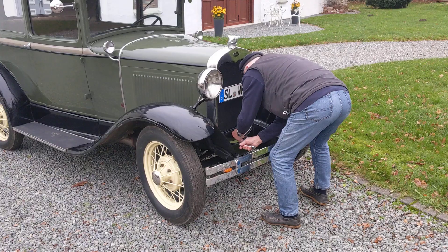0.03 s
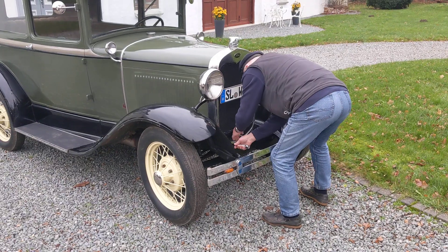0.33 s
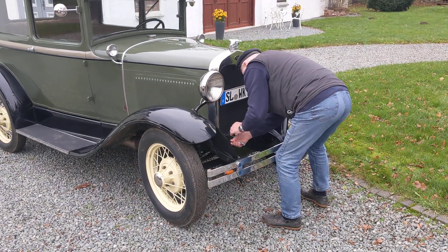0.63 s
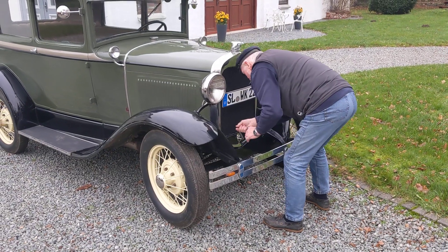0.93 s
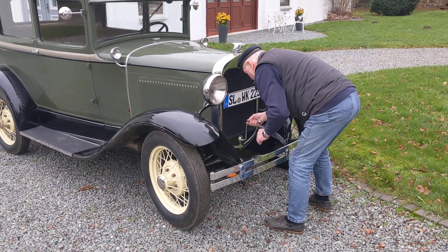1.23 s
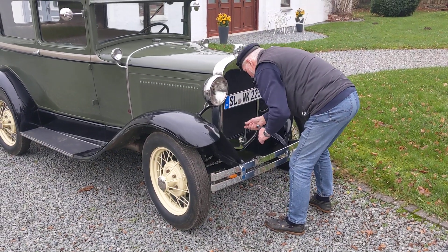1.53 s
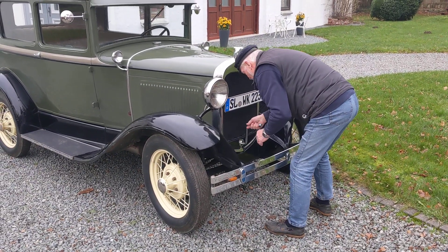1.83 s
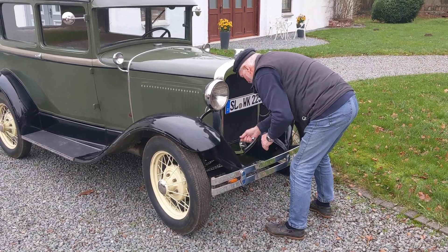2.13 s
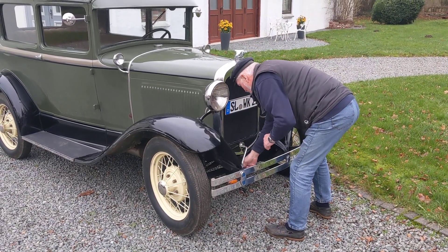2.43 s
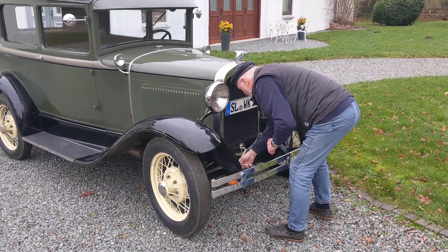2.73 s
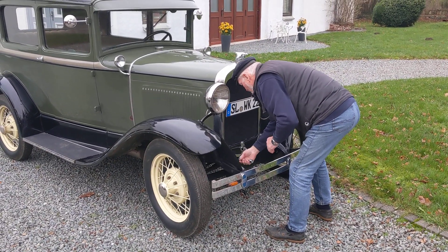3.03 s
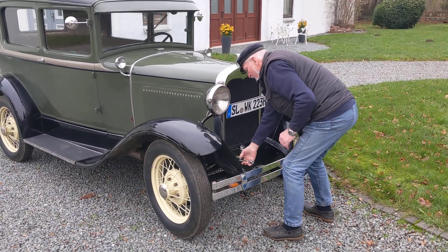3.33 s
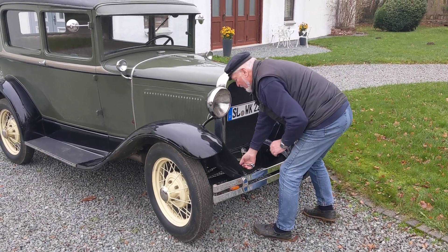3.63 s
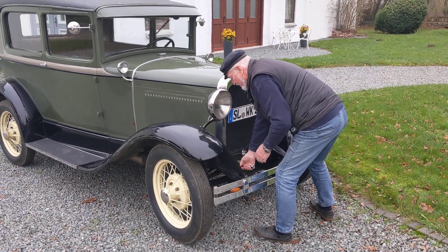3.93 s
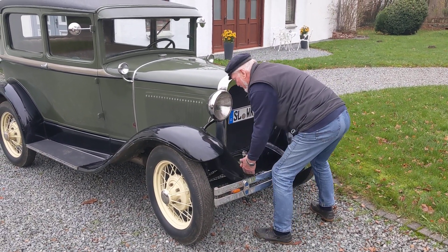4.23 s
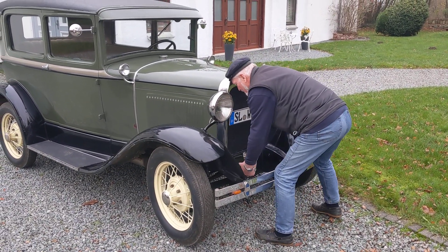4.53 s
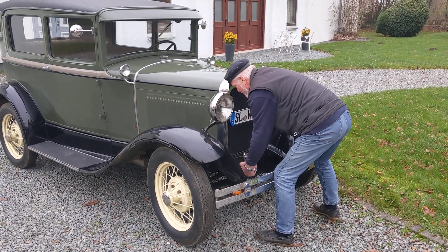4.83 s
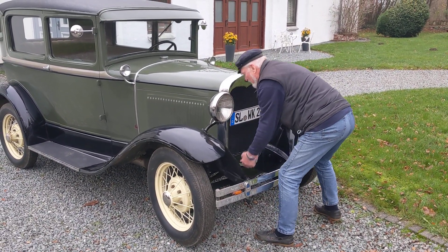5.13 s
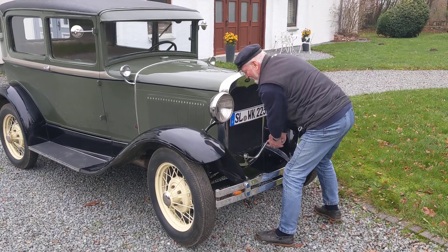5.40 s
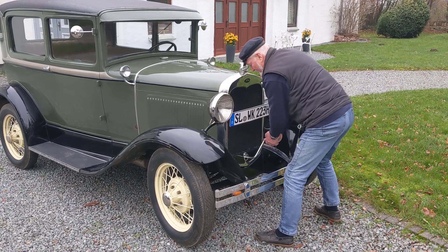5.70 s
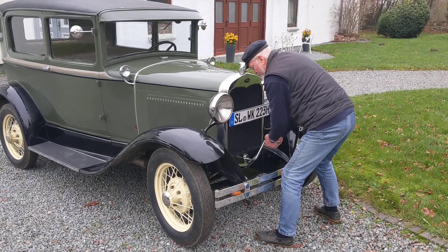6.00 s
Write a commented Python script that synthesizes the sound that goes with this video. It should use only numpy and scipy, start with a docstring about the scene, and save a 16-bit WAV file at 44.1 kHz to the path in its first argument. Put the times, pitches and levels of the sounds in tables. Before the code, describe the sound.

A metal hand crank slides into a vintage car, clanking and scraping as the engine is eased round and the chassis groans and rumbles. The knocks stop and shoes shift on gravel. Then one sharp pull brings a loud clatter, and the engine catches, rasps briefly against the crank and settles into a slow, ticking idle. The car stands a few metres away to the right, in a quiet outdoor hush.

```python
"""A crank handle scrapes and clanks over an outdoor hush: a vintage car is being started by hand.
Friction and impacts excite the modes of its ironwork as the engine is eased round and the car heaves.
Shoes shift on the gravel drive, each crunch a crowd of tiny collisions, and a sleeve rustles.
After one sharp pull the engine catches, throws the crank off its ratchet and settles to a slow idle,
a train of pulses that rings the exhaust. The car stands a few metres away, to the right."""
import sys
import numpy as np
from scipy import signal
from scipy.fft import rfft, irfft, next_fast_len
from scipy.io import wavfile

SR = 44100
rng = np.random.default_rng(int(sys.argv[2]) if len(sys.argv) > 2 else 0)


def log_audio(samples):
    """Write samples as a 16-bit WAV file to the path given in sys.argv[1]."""
    # one column per channel
    frames = np.atleast_2d(samples).T
    # limit to full scale, then quantise
    limited = np.clip(frames, -1, 1)
    pcm = np.round(limited * 32767).astype(np.int16)
    wavfile.write(sys.argv[1], SR, pcm)


N = 276066
TIME = np.arange(N) / SR

# blows of the crank:
# (time [s], chatter time [s], chassis thud [dB], shaft clang [dB], handle clash [dB])
CRANK_BLOWS = [(0.249, 0.0094, -46, -34, -30.5), (.31, .0068, -45, -30.5, -25),
               (0.324, 0.008, -45, -36, -26), (.526, 0.0013, -54.5, -55, -42),
               (0.654, 0.0053, -44.5, -40, -45.5), (0.712, 0.0061, -47, -36, -41),
               (0.791, 0.0054, -48.5, -46.5, -44.5), (0.858, 0.0093, -55.5, -41.5, -36.5),
               (.909, .011, -55, -52, -48.5), (0.926, .008, -58, -45, -42.5),
               (0.99, 0.0061, -60, -43.5, -43.5), (1.001, 0.015, -67, -63, -42),
               (1.047, 0.0063, -44, -45.5, -42.5), (1.101, 0.0033, -95, -72, -49.5),
               (1.134, 0.0087, -64, -67, -51), (1.286, 0.0061, -43, -36, -30.5),
               (1.311, 0.0026, -41.5, -58, -45.5), (1.517, 0.0046, -48, -43.5, -50),
               (1.675, .0035, -53, -57.5, -64), (1.946, 0.0079, -45, -46, -47),
               (1.963, 0.002, -54.5, -55, -46), (2.45, 0.0036, -53, -50, -53.5),
               (2.522, 0.0056, -67, -45.5, -42.5), (2.547, 0.00056, -71, -71, -54),
               (2.692, 0.0013, -43, -40, -49), (2.713, 0.0027, -50, -42, -47),
               (2.737, 0.0052, -47, -51, -44), (2.776, 0.00081, -65, -69, -46.5),
               (2.813, 0.0035, -48, -37.5, -43.5), (2.824, 0.0027, -41, -52, -38),
               (2.9, 0.0066, -38, -39.5, -31), (2.961, 0.0026, -46, -54, -47),
               (3.323, 0.00067, -59.5, -51, -41), (5.356, 0.006, -59, -51, -52.5),
               (5.478, 0.022, -32, -24.5, -23.5), (5.488, 0.0037, -29.5, -27.5, -26.5),
               (5.498, 0.0037, -31, -28, -21), (5.545, 0.0013, -45, -38, -40.5),
               (5.556, 0.014, -45, -35, -32.5), (5.597, 0.0065, -40, -36, -34.5),
               (5.682, 0.053, -58, -46, -41.5), (5.733, 0.011, -43, -41, -36.5)]
# thud, clang, clash and tick registers of the ironwork: (lower edge [Hz], upper edge [Hz])
IRON_REGISTERS = [(100, 450), (450, 1800), (1800, 5800), (5800, 15500)]


def undb(db):
    """Amplitude ratio of a level in decibels."""
    return 10 ** (np.asarray(db) / 20)


def unit(x):
    """Normalisation to an rms of 1."""
    return x / np.sqrt(np.mean(x ** 2) + 1e-20)


def add(track, s, sound):
    """Superposition: a sound joins the track at time s."""
    i = int(np.clip(s * SR, 0, N - 1))
    track[i:i + len(sound)] += sound[:N - i]


def band(x, lo_hz, hi_hz, order=3):
    """Causal band-pass filtering."""
    sos = signal.butter(order, [lo_hz, min(hi_hz, .45 * SR)], "band", fs=SR, output="sos")
    return signal.sosfilt(sos, x)


def colour(x, spectrum, lag_s=0):
    """Spectral shaping by (frequency [Hz], gain [dB]) points; a linear phase adds the delay."""
    size = next_fast_len(len(x) + 64, real=True)
    f = np.fft.rfftfreq(size, 1 / SR)
    hz, db = np.transpose(spectrum)
    gain = undb(np.interp(np.log(f + 1), np.log(hz), db))
    return irfft(rfft(x, size) * gain * np.exp(-2j * np.pi * f * lag_s), size)[:len(x)]


def fade(t, t60):
    """Exponential decay, by 60 dB in t60 seconds."""
    return np.exp(-np.log(1000) * t / t60)


def ring(modes, size=22050):
    """Modal impulse response: a damped sine for each (frequency [Hz], energy [dB], t60 [s])."""
    t = TIME[:size]
    return unit(sum((-1) ** k * undb(db) / np.sqrt(t60) * fade(t, t60) * np.sin(2 * np.pi * hz * t)
                    for k, (hz, db, t60) in enumerate(modes)))


def excite(force, response):
    """Convolution: a linear body answers a force through its impulse response."""
    return signal.fftconvolve(force, response)[:len(force)]


def grains(per_s, spread_db, size=N):
    """Shot noise: random tiny impacts, a few much stronger than the rest if spread_db is positive."""
    strength = undb(spread_db * np.minimum(rng.exponential(size=size), 4))
    return (rng.random(size) < per_s / SR) * strength * rng.standard_normal(size)


def gestures(table, attack_s, t60):
    """Power summation of rows that rise, hold and decay; one envelope for each level column."""
    power = 0
    for s, length_s, *levels_db in table:
        rise = np.clip((TIME - s) / attack_s, 0, 1)
        release = fade(np.maximum(TIME - s - length_s, 0), t60)
        power = power + np.outer(undb(levels_db), rise * release) ** 2
    return np.sqrt(power)


def air(level_db=-57):
    """Stationary noise: the distant outdoor hush, its level set by the part above 200 Hz."""
    # spectrum of the hush: (frequency [Hz], gain [dB])
    hush_spectrum = [(12, -50), (20, 6.5), (64, -13.5), (175, -4), (333, -11.5), (393, -15), (649, -11),
                     (1040, -12.5), (1380, -19), (1630, -9), (4070, -23), (6540, -27.5), (15500, -31.5)]
    hush = colour(rng.standard_normal(N), hush_spectrum)
    return hush * undb(level_db) / band(hush, 200, 15500).std()


def rumble(steady_db=-55, rise_s=0.033):
    """Amplitude modulation: a steady low noise swells with each heave of the car on its springs."""
    # heaves as the engine is turned over: (time [s], level [dB])
    heaves = [(.03, -50.5), (1.0, -45), (1.55, -48), (1.92, -48), (2.86, -46)]
    # spectrum of the rumble: (frequency [Hz], gain [dB])
    rumble_spectrum = [(11, -62), (18, -17), (48, 0), (64, -2), (97, -11), (110, -13.5), (140, -28),
                       (240, -120)]
    swell, = gestures([(s, rise_s, db) for s, db in heaves], rise_s, t60=2.5)
    return unit(colour(rng.standard_normal(N), rumble_spectrum)) * np.hypot(undb(steady_db), swell)


def iron(dense_db=4, low_t60=0.29, high_t60=0.046, size=22050):
    """Modal response of the ironwork: clear modes over dense ones whose treble is damped fastest."""
    # clear modes of crank and front end: (frequency [Hz], energy [dB], t60 [s])
    clear_modes = [(133, -4, .25), (152, -4, .22), (180, -12, .2), (255, -13, .25), (333, -6, .25),
                   (439, -13, .2), (590, -7, .3), (680, -8, .2), (720, -4, .2), (769, -1.5, .25),
                   (812, -4, .25), (941, -3, .25), (1010, -4, .25), (1075, -.5, .2), (1170, -2, .15),
                   (1530, -8, .14), (1720, -12, .12), (2131, -10, .14), (2470, -7, .11), (2967, -2, .12),
                   (3444, -7, .13), (3700, -10, .1), (4050, -6, .08), (4380, -8, .1), (5170, -11, .08),
                   (6400, -8, .035), (8320, -12, .07), (9150, -16, .05), (10120, -13, .05),
                   (12800, -23, .04)]
    # spectrum of the dense modes: (frequency [Hz], gain [dB])
    dense_spectrum = [(100, -13.5), (160, -20), (390, -21), (700, -5.5), (1150, -13), (1400, -11.5),
                      (2200, -14.5), (3100, -10), (4800, -19.5), (5700, -26.5), (8500, -21.5),
                      (10800, -21.5), (12200, -29.5), (15500, -36)]
    t = TIME[:size]
    noise = colour(rng.standard_normal(size), dense_spectrum)
    t60s = np.geomspace(low_t60, high_t60, len(IRON_REGISTERS))
    dense = sum(band(noise, *edges) * fade(t, t60) / np.sqrt(t60)
                for edges, t60 in zip(IRON_REGISTERS, t60s))
    # each grip and strike point shifts and weights the modes anew
    modes = [(hz * rng.normal(1, .008), db + rng.normal(0, 3), t60) for hz, db, t60 in clear_modes]
    return ring(modes) + undb(dense_db) * unit(dense)


def crank_friction(scrape_db=-1, groan_db=-1, rattle_db=-27, rasp_db=2):
    """Friction drives resonances: the shaft scrapes in its guide, the chassis groans, the grip squeaks."""
    # pushes on the crank: (time [s], duration [s], scrape [dB], chassis groan [dB])
    pushes = [(.03, 0.45, -50.5, -44.5), (.25, 0.058, -36.5, -44), (.65, 0.14, -53.5, -50.5),
              (.87, 0.27, -50.5, -44.5), (1.28, 0.054, -48.5, -43.5), (1.51, 0.19, -61, -48.5),
              (1.93, 0.06, -59, -48), (2.14, 0.33, -70.5, -61), (2.44, 0.13, -54, -46.5),
              (2.68, 0.23, -50.5, -51)]
    # the shaft slides into its guide: (time [s], duration [s], level [dB])
    insertion = [(.17, 0.24, -52.5)]
    # dry squeaks of the handle: (time [s], duration [s], level [dB])
    squeaks = [(2.12, 0.208, -60.5), (2.37, .025, -40.5)]
    # resonances of the grip: (frequency [Hz], energy [dB], t60 [s])
    grip_modes = [(3990, -1.5, 0.015), (6500, -10, 0.018), (8330, -0.5, 0.061)]
    # scrape that swells into the starting pull: (time [s], duration [s], level [dB])
    starting_pull = [(5.458, 0.032, -27.5)]
    rub, load = gestures(pushes, attack_s=0.0083, t60=0.53)
    # the loose front end rattles on after each blow, below its clash
    rattles = [(s, chatter_s, clash_db + rattle_db) for s, chatter_s, _, _, clash_db in CRANK_BLOWS]
    rattle, = gestures(rattles, attack_s=0.01, t60=0.5)
    rubbed = excite(grains(2500, spread_db=4), iron(dense_db=11))
    scrape = unit(band(rubbed, 460, 3800, order=2)) * np.hypot(rub * undb(scrape_db), rattle)
    groan = unit(band(rubbed, 93, 308)) * load * undb(groan_db)
    slips = grains(5000, spread_db=0)
    slide = unit(band(slips, 5800, 9800, order=2)) * gestures(insertion, attack_s=0.061, t60=0.083)[0]
    grip = unit(excite(slips, ring(grip_modes))) + undb(rasp_db) * unit(band(slips, 2400, 3560))
    squeak = grip * gestures(squeaks, attack_s=0.25, t60=0.046)[0]
    pull = unit(band(rubbed, 120, 14000, order=2)) * gestures(starting_pull, attack_s=0.05, t60=.1)[0]
    return scrape + groan + slide + squeak + pull


def crank_impacts(contacts_per_s=2800, hard_s=0.0045, roughness=0.4, ring_rise_s=0.0016, size=22050):
    """Impact excitation: loose joints slam shut and chatter; the shorter the contact, the brighter."""
    # single parts ringing after a knock: (time [s], frequency [Hz], level [dB], t60 [s])
    ringing_parts = [(0.252, 1083, -29, 0.14), (0.309, 5980, -27.5, .27), (0.311, 1584, -28, .18),
                     (.314, 2520, -47, 0.086), (.526, 6560, -23.5, 0.019), (0.526, 10030, -27.5, .04),
                     (0.714, 1040, -37, 0.18), (0.861, 2560, -34.5, 0.25), (1.047, 2496, -35, 0.13),
                     (1.519, 823, -29.5, 0.062), (1.975, 178, -38, 0.24), (2.295, 130.3, -41.5, 0.59),
                     (3.324, 10030, -19.5, 0.038), (5.372, 1560, -37.5, .092), (5.454, 134, -37.5, 0.25),
                     (5.500, 787, -25, 0.14), (5.557, 5200, -27.5, .06), (5.597, 2980, -20.5, 0.068),
                     (5.648, 1765, -30, 0.17)]
    out, t = np.zeros(N), TIME[:size]
    attack = slice(0, SR // 40)
    for s, chatter_s, thud_db, clang_db, clash_db in CRANK_BLOWS:
        swell = np.minimum(.35 + 3 * t / chatter_s, 1)
        decay = np.exp(-(t / (1.5 * chatter_s)) ** 2)
        force = grains(contacts_per_s, spread_db=3, size=size) * swell * decay
        force[0] += np.linalg.norm(force) * .0011 / chatter_s + 1e-6  # short knocks start hardest
        blow = excite(force, iron())
        # the edge tick follows the clash and is stronger for hard, short contacts
        tick_db = clash_db - 13.5 + 18 * np.exp(-(chatter_s / hard_s) ** 2)
        for edges, db in zip(IRON_REGISTERS, (thud_db, clang_db, clash_db, tick_db)):
            part = band(blow, *edges)
            add(out, s, undb(db) * part / part[attack].std())
    for s, hz, db, t60 in ringing_parts:
        # small parts buzz in their joints while they ring, heavy ones hardly at all
        buzz = min(hz / 5000, 1) * unit(band(rng.standard_normal(size), 12, 160, order=2))
        tone = np.sin(2 * np.pi * hz * t + buzz) * (1 + roughness * buzz[::-1])
        add(out, s, undb(db) * tone * fade(t, t60) * np.minimum(t / ring_rise_s, 1))
    return out


def stones(snap_t60=0.03, settle_db=-17, settle_t60=0.12, size=4410):
    """Two-stage decay: a stone snaps and its neighbours settle. Returns the far and near shares."""
    # single stones: (time [s], level [dB], pitch [Hz], leftward bias [dB])
    snaps = [(1.749, -36, 2470, -0.5), (1.755, -32, 2180, 20), (1.778, -43.5, 1470, 1),
             (3.457, -49, 3800, 0), (3.488, -52, 4950, -4), (3.517, -35.5, 5770, 0), (3.546, -42, 4900, -7),
             (3.573, -46, 4130, -15), (3.59, -41, 3780, -15), (3.835, -46, 3180, 1),
             (3.876, -43.5, 4800, -5), (4.012, -50, 4200, -10), (4.336, -37.5, 4200, 1),
             (4.572, -45.5, 4870, 1), (4.61, -48, 3340, -12), (4.982, -53, 3530, -8),
             (5.213, -51, 1920, -3)]
    far, near, t = np.zeros(N), np.zeros(N), TIME[:size]
    for s, db, hz, left_db in snaps:
        near_share = np.clip(1 - undb(-left_db), 0, 1)
        # near stones, on the left, arrive short and clean
        impact = fade(t, snap_t60 * undb(-2 * max(left_db, 0)))
        settling = undb(settle_db - 2 * left_db) * fade(t, settle_t60)
        snap = band(rng.standard_normal(size) * (impact + settling), hz / 3.07, hz * 1.93)
        snap *= undb(db) / snap[:SR // 125].std()
        add(far, s, (1 - near_share) * snap)
        add(near, s, 2 * near_share * snap)
    return far, near


def shoes(tread_db=-1):
    """Granular friction: pebbles of several sizes grind underfoot, with a duller crunch under weight."""
    # slips of the shoes: (time [s], duration [s], crunch [dB], weight [dB])
    slips = [(3.07, 0.047, -63, -75.5), (3.31, 0.093, -56, -60), (3.44, 0.08, -49, -74),
             (3.56, 0.031, -46, -52.5), (3.65, 0.071, -52, -61.5), (3.79, .14, -50, -63.5),
             (3.95, .15, -49.5, -58), (4.28, 0.038, -53.5, -56), (4.555, 0.059, -46, -49),
             (4.66, 0.018, -59, -71), (4.92, 0.081, -55, -61.5), (5.11, 0.038, -60.5, -62.5),
             (5.18, 0.034, -49, -51.5), (5.26, 0.24, -59, -63)]
    # faint grinding between slips: (time [s], duration [s], crunch [dB], weight [dB])
    stance = [(3.006, 1.765, -63, -68), (4.872, 0.35, -62.5, -79)]
    # spectrum of the gravel: (frequency [Hz], gain [dB])
    gravel_spectrum = [(880, -71), (1500, -61.5), (1790, -10.5), (3180, -6), (5340, -11.5), (6820, -7.5),
                       (9420, -16.5), (10500, -9), (12200, -21), (15500, -31)]
    sliding, weight = gestures(slips + stance, attack_s=0.019, t60=0.19)
    judder = undb(2.2 * unit(band(rng.standard_normal(N), 10, 70, order=2)))
    edges_hz = np.geomspace(1200, 15500, 7)  # one band for each pebble size
    pebbles = sum(band(grains(2000, spread_db=3), lo, hi, order=2)
                  for lo, hi in zip(edges_hz, edges_hz[1:]))
    grit = unit(colour(pebbles, gravel_spectrum))
    tread = unit(band(grains(2500, spread_db=-2), 393, 1230, order=2))
    return judder * (grit * sliding + tread * weight * undb(tread_db))


def sleeve():
    """Friction noise: cloth drags in a faint, narrow-band rustle as the grip is changed."""
    # rub of the sleeve: (time [s], duration [s], level [dB])
    rubs = [(4.15, 0.42, -61)]
    rustle = unit(band(grains(3000, spread_db=4), 1800, 2300, order=2))
    return rustle * gestures(rubs, attack_s=0.058, t60=0.22)[0]


def engine(ticks_per_firing=0.72, knock_db=-3, valve_ring_db=-12, valve_gain_db=1, exhaust_gain_db=1):
    """Periodic forcing: slow firings thump the exhaust and shake the gears while the valve gear ticks."""
    # run-up to idle: (time [s], firing rate [Hz], exhaust [dB], gear clatter [dB], valve noise [dB])
    run_up = [(5.52, 15, -62, -50, -60), (5.60, 16.5, -49, -42, -50), (5.70, 19.5, -44, -43, -43),
              (5.78, 20.5, -41, -42, -42), (5.90, 19, -39, -40, -45), (6.04, 17.2, -39, -42, -47),
              (6.16, 15.7, -40, -41, -47), (6.26, 15.5, -42, -43, -48)]
    # resonances of the exhaust: (frequency [Hz], energy [dB], t60 [s])
    exhaust_modes = [(57, 0, .085), (152, -10, .07), (250, -15, .06), (332, -15, .08)]
    # spectrum of the gear clatter: (frequency [Hz], gain [dB])
    gear_spectrum = [(210, -9), (350, -10), (421, -20), (518, -4.5), (755, -4.5), (822, -19), (1170, -7.5),
                     (1400, -31), (1580, -5.5), (2200, -19), (2860, -12), (4840, -120)]
    # hiss and rattle of the valve gear: (frequency [Hz], gain [dB])
    valve_spectrum = [(1200, -9), (2000, -2), (3000, 3.5), (5000, -6), (8500, -4), (11000, -5.5),
                      (12500, -14), (15500, -16)]
    # short rings of the valve gear: (frequency [Hz], energy [dB], t60 [s])
    valve_modes = [(2600, -3, .006), (3700, -5, .005), (6430, -7, .008), (7300, -3, .014), (8310, -1, .016)]
    times, *columns = np.transpose(run_up)
    rate, exhaust_db, gears_db, valves_db = [np.interp(TIME, times, column) for column in columns]
    cycle = np.cumsum(rate * (TIME > times[0])) / SR
    running, phase = cycle > 0, cycle % 1
    firings = np.diff(np.floor(cycle), prepend=0)
    # a cold engine burns unevenly: each firing has its own strength and a puff of gas behind it
    strength = undb(1.5 * rng.standard_normal(64))[cycle.astype(int) % 64]
    puff = .1 * band(rng.standard_normal(N), 100, 600, order=2) * np.exp(-phase / .6)
    exhaust = excite((firings + puff) * strength, ring(exhaust_modes))
    shaking = grains(2500, spread_db=2) * (1 + .35 * np.cos(2 * np.pi * phase)) * strength
    knock = unit(band(excite(shaking, iron(dense_db=9)), 360, 1350))
    gears = unit(colour(shaking, gear_spectrum)) + undb(knock_db) * knock
    tick_phase = cycle * ticks_per_firing % 1
    taps = grains(12000, spread_db=0) * (1 + np.exp(-tick_phase / .25))
    valve_ring = unit(excite(taps, ring(valve_modes)))
    valves = unit(colour(taps, valve_spectrum)) + undb(valve_ring_db) * valve_ring
    parts = (exhaust, exhaust_db + exhaust_gain_db), (gears, gears_db), (valves, valves_db + valve_gain_db)
    return running * sum(x / x[running].std() * undb(db) for x, db in parts)


def ratchet():
    """Sliding contact: the engine's dog overruns the crank and its teeth scrape past in bright rasps."""
    # rasps of the teeth: (time [s], duration [s], level [dB])
    rasps = [(5.624, 0.027, -32), (5.68, 0.023, -32), (5.73, 0.01, -33)]
    teeth = excite(grains(2800, spread_db=-1), iron())
    return unit(band(teeth, 5200, 15000, order=2)) * gestures(rasps, attack_s=0.0033, t60=0.14)[0]


def scatter(x, level_db=-9, t60=0.04, size=2205):
    """Diffuse scattering: wings, bumper and pebbles throw back a brief, fluttering smear."""
    smear = band(rng.standard_normal(size), 750, 23200, order=2) * fade(TIME[:size], t60)
    flutter = unit(band(rng.standard_normal(N), 15, 150, order=2))
    return flutter * excite(x, undb(level_db) * smear / np.linalg.norm(smear))


def yard(x, early_db=-13, early_t60=0.0097, tail_db=-17, tail_t60=0.47, rise_s=0.002, size=26460):
    """Reverberation: early reflections off gravel and car body, then a faint tail off the house front."""
    t = TIME[:size]
    early = band(rng.standard_normal(size), 830, 3500, order=2) * fade(t, early_t60)
    tail = band(rng.standard_normal(size), 620, 6700, order=2) * fade(t, tail_t60)
    tail *= np.minimum(t / rise_s, 1)
    response = undb(early_db) * early / np.linalg.norm(early) + undb(tail_db) * tail / np.linalg.norm(tail)
    return excite(x, response)


def scene(shared_air_db=-4, own_air_db=-8):
    """Time and level differences place the car to the right: the left channel is later and duller."""
    # response of the two microphone ports: (frequency [Hz], left gain [dB], right gain [dB])
    port_gains = [(94, -2.5, -1.5), (1160, 2.5, 3), (1900, -4.5, -3.5), (3300, -29.5, 5.5), (4800, 3, 6.5),
                  (7370, -24.5, 5.5), (16200, -17, -4.5)]
    ports = np.array(port_gains)
    far_stones, near_stones = stones()
    direct = crank_impacts() + crank_friction() + ratchet() + shoes() + sleeve() + far_stones + engine()
    common = direct + undb(shared_air_db) * air() + rumble()
    left = colour(common + scatter(direct), ports[:, [0, 1]], lag_s=0.00014) + near_stones
    right = colour(common + scatter(direct), ports[:, [0, 2]])
    return np.array([side + yard(direct + near_stones / 2) + undb(own_air_db) * air()
                     for side in (left, right)])


def record(dry, top_hz=15900):
    """Gating and band limiting: the sound opens after a moment and a steep low-pass cuts the top."""
    opening = np.clip((TIME - .038) / .006, 0, 1)
    return signal.sosfilt(signal.ellip(10, .2, 80, top_hz, fs=SR, output="sos"), dry * opening)


dry = scene()
out = record(dry)
log_audio(out)
```